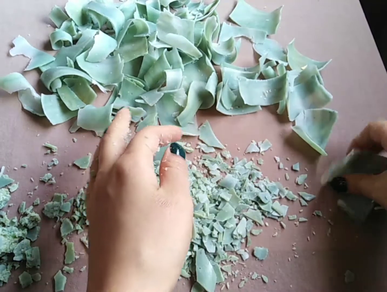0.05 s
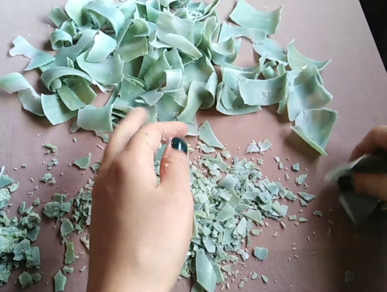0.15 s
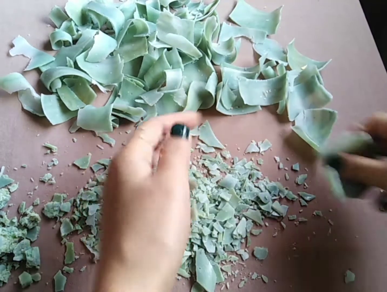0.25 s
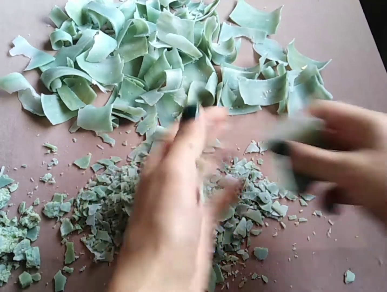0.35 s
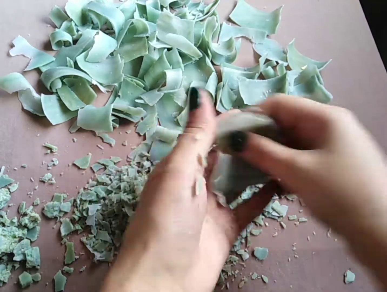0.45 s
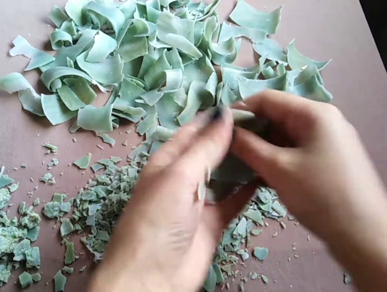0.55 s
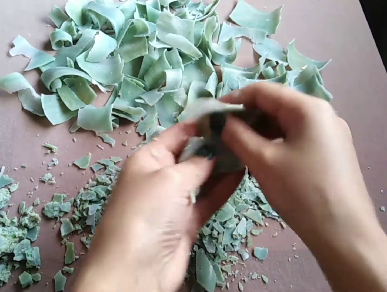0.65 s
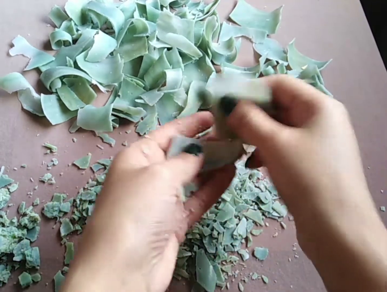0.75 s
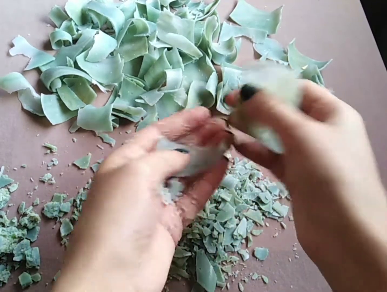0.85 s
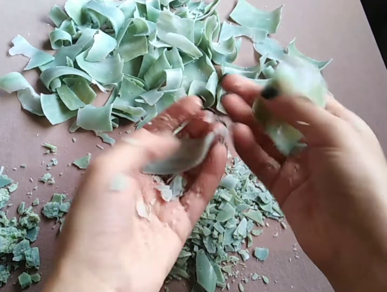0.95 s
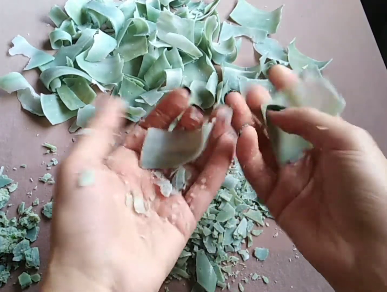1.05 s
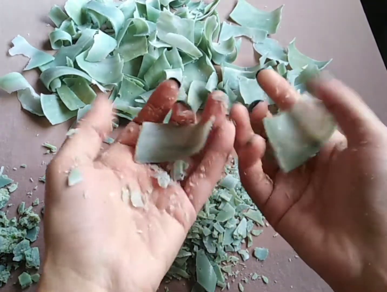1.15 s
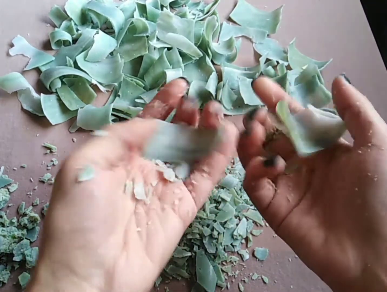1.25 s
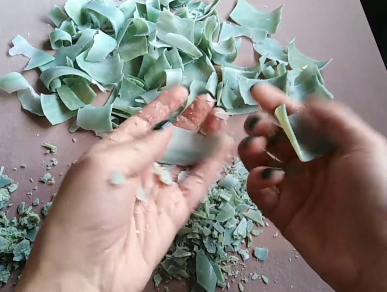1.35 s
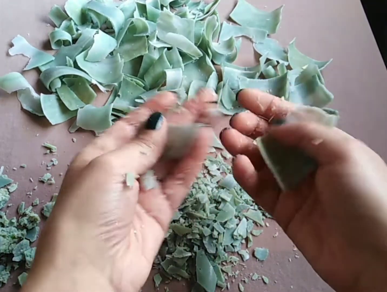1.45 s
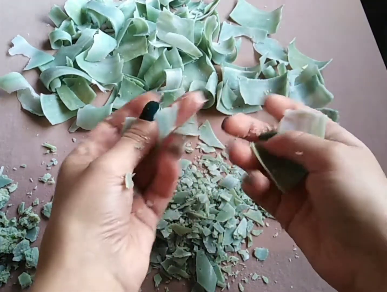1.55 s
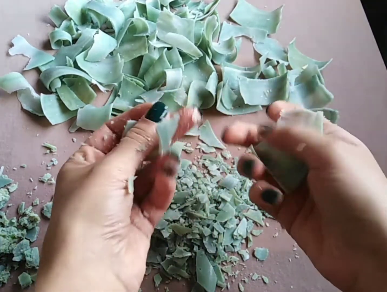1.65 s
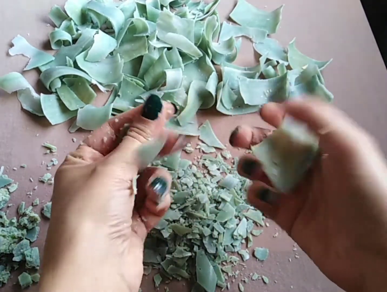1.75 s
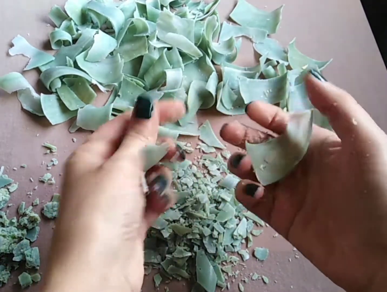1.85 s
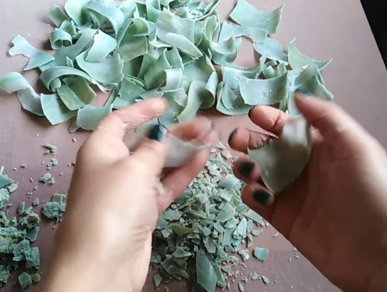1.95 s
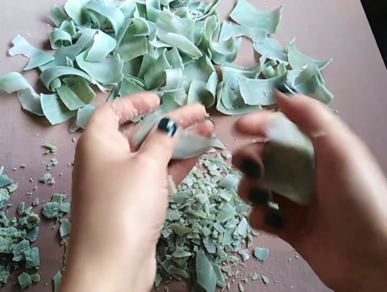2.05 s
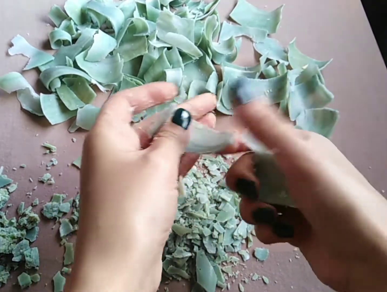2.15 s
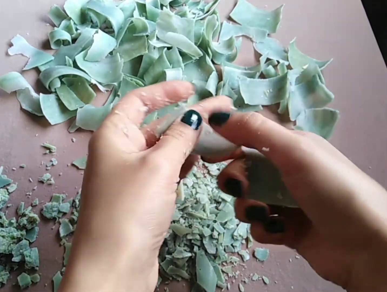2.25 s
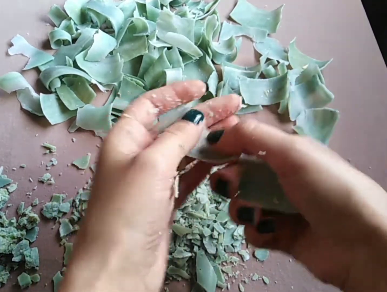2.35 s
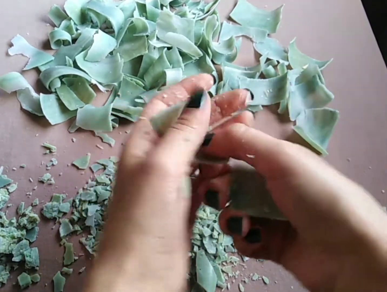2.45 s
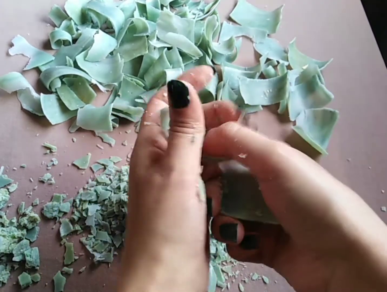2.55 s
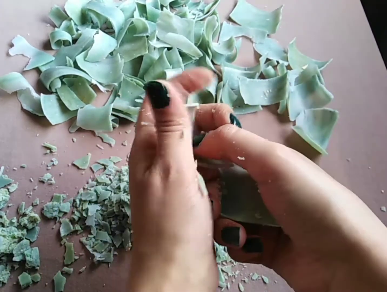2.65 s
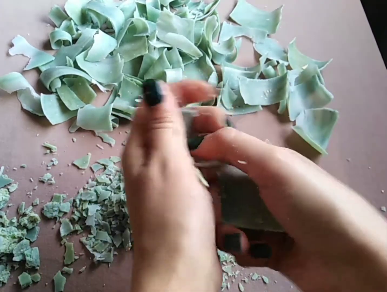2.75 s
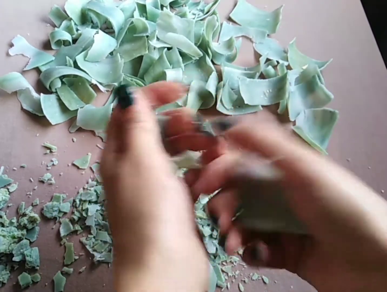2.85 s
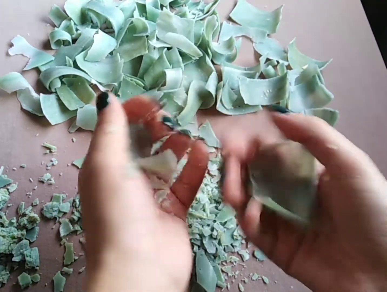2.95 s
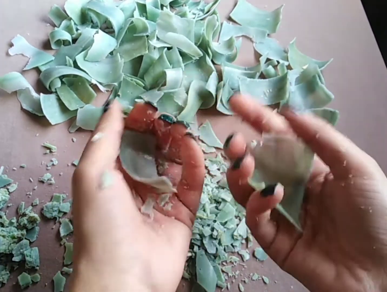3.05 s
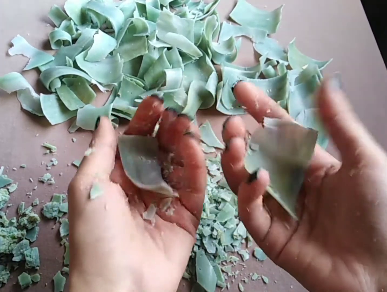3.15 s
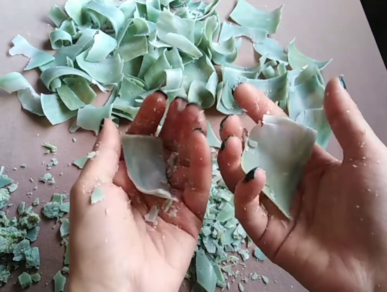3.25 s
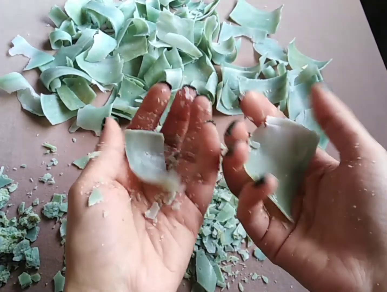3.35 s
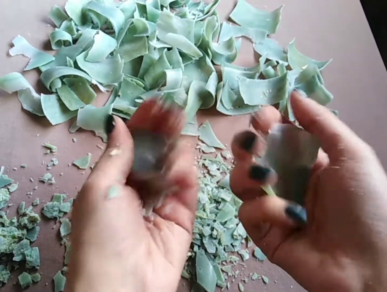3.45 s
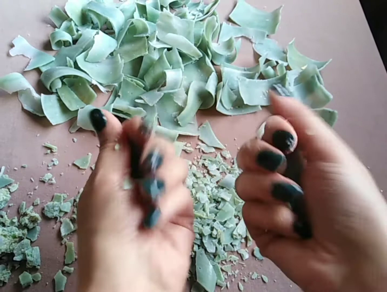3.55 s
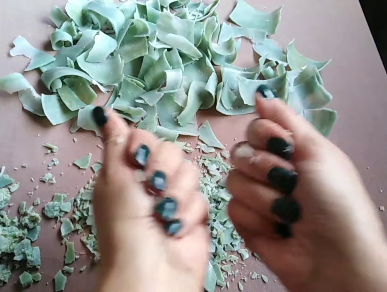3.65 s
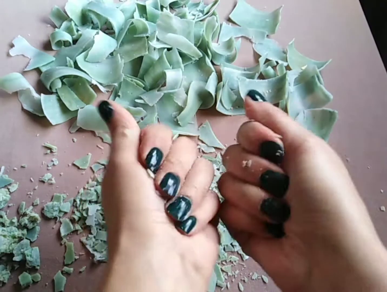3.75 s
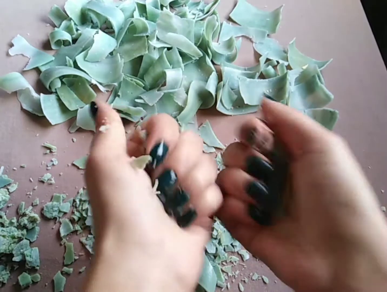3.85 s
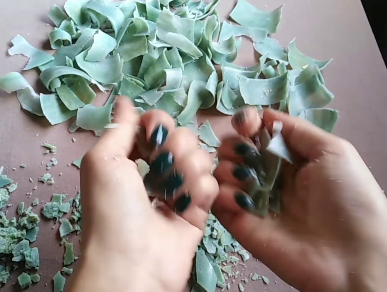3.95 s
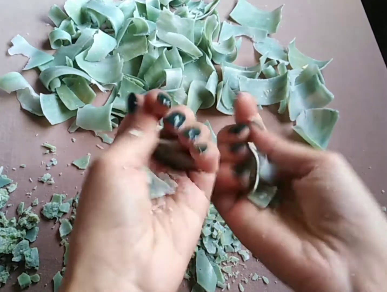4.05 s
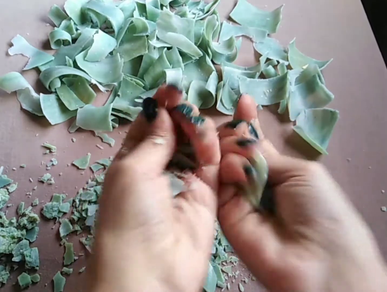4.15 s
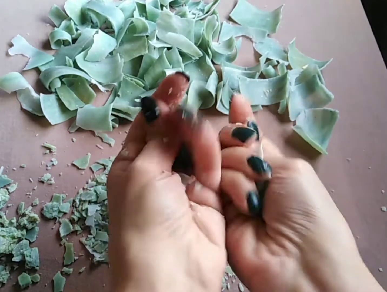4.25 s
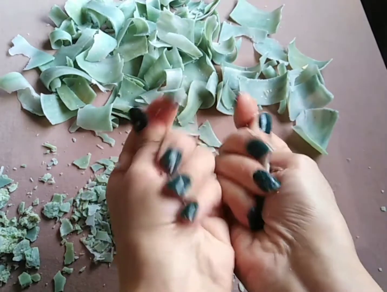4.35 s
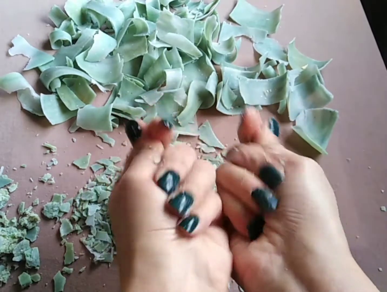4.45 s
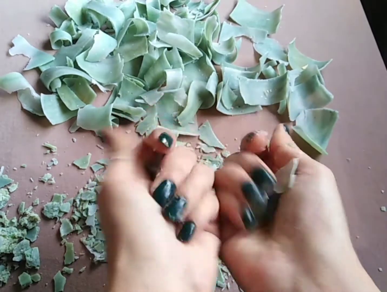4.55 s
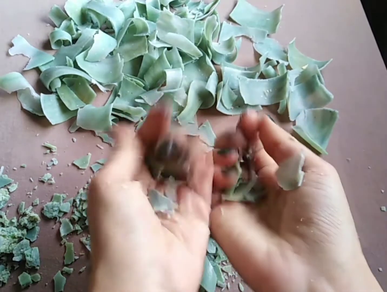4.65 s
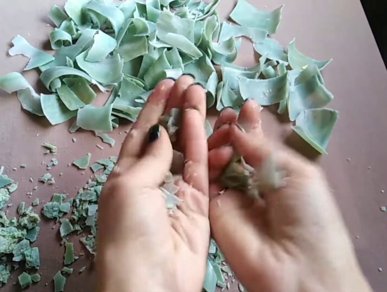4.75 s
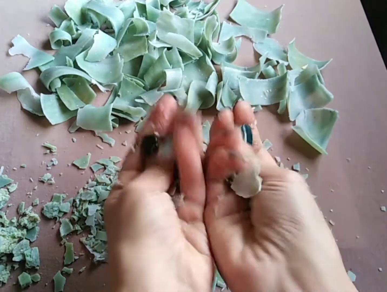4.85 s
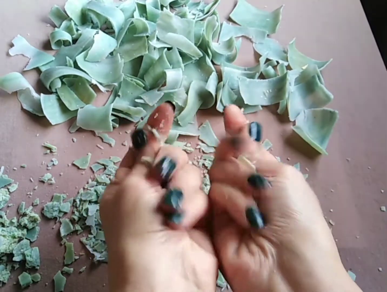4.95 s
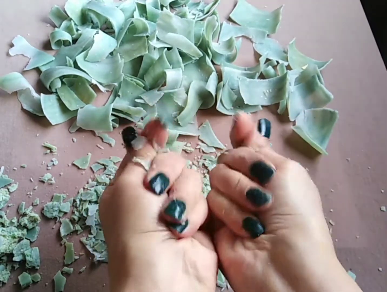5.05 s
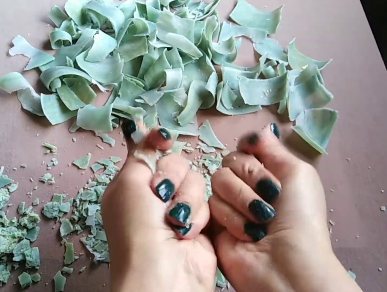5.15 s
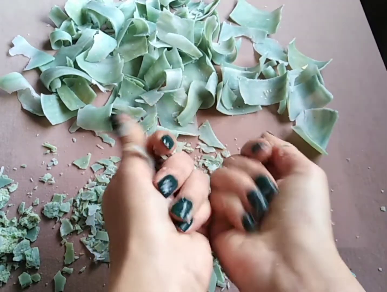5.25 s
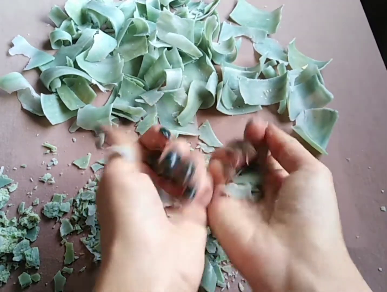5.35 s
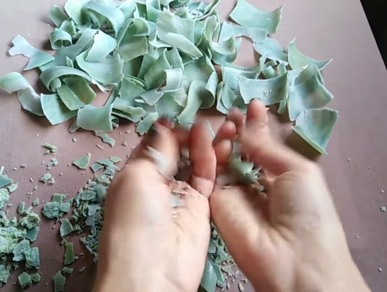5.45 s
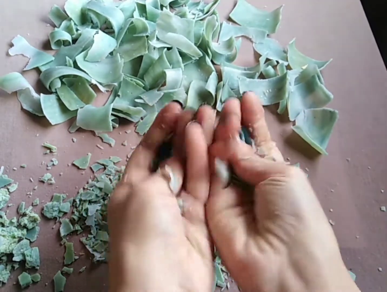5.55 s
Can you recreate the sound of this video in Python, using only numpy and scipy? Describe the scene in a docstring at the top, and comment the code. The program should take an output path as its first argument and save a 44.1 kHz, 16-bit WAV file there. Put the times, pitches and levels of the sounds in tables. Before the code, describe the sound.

Very close stereo capture of dry soap shavings in two hands over a table. A few light ticks and snaps come first, then a quiet stretch, single clicks, and a sudden loud dense crunch as the fists close. Crackling squeezes follow in bursts, with gritty crumbs between them. Small, quiet room, with soft hiss, faint outside rumble and a low hum that swells late.

```python
"""In a small quiet room, brittle curls of soap are handled, then crushed in two fists close over a table.
Flakes snap one by one as noise-driven resonances; curls tear as swelling runs of slips near one pitch.
Between the snaps crumbs grind and rustle: random clicks, scattered at random among resonances of many pitches.
A low rumble from outside wavers and a drone swells, made of resonant noise and a wandering tone,
under the steady hiss of a small pair of microphones."""
import sys
import numpy as np
from scipy import signal
from scipy.fft import rfft, irfft, next_fast_len
from scipy.io import wavfile

SR = 44100
rng = np.random.default_rng(int(sys.argv[2]) if len(sys.argv) > 2 else 0)


def waveform_to_disk(signal):
    """Save audio, clipped to [-1, 1], as 16-bit WAV at the path in sys.argv[1]."""
    frames = np.transpose(np.atleast_2d(signal))
    scaled = np.clip(frames, -1, 1) * 32767
    samples = np.round(scaled).astype(np.int16)
    wavfile.write(sys.argv[1], SR, samples)


N = 247397

# Fingers grinding crumbs; dust_db is the finest dust against the level:
# full_force_s, level_db, held_s, pitch_hz, dust_db
GRINDS = [(0.0, -52.5, 0.054, 4345, -12), (0.158, -48, 0.021, 3300, -9), (0.22, -52.5, 0.021, 4800, -8.5),
          (0.58, -55, 0.069, 5100, -16), (0.67, -50, 0.016, 5560, -2), (0.71, -49, 0.031, 5200, -27),
          (0.715, -54.5, 0.029, 3120, -28), (0.72, -60, 0.029, 1800, -28), (0.8, -58.5, 0.068, 5470, -11),
          (0.91, -57.5, 0.068, 5900, -3), (1.025, -52, 0.045, 4700, 1), (1.099, -48.5, 0.043, 5070, 2.5),
          (1.27, -59, 0.064, 5560, -5.5), (1.481, -51.5, 0.045, 4460, -6.5),
          (1.57, -54.5, 0.044, 5640, -4.5), (1.98, -56.5, 0.068, 5400, -25),
          (2.13, -55.5, 0.051, 5800, -30), (2.56, -50, 0.038, 4300, -17), (2.65, -53.5, 0.055, 5000, -12),
          (2.765, -54.5, 0.019, 4700, -25), (3.009, -47.5, 0.043, 5200, -1.5), (3.08, -52, 0.023, 4500, -9),
          (3.23, -59.5, 0.022, 4960, -8), (3.53, -60.5, 0.062, 4930, -21), (3.625, -35.5, 0.035, 3230, -4),
          (3.68, -27.5, 0.027, 2760, -1.5), (3.701, -21.5, 0.014, 3280, -1.5),
          (3.735, -26, 0.033, 2900, -16.5), (3.9, -42, .07, 3000, -7), (4.03, -47.5, 0.039, 3500, -14),
          (4.11, -45.5, 0.12, 4200, -36), (4.261, -38, 0.011, 3970, -8), (4.315, -41, 0.069, 3800, -7),
          (4.41, -38.5, 0.056, 3170, -8), (4.497, -44.5, 0.042, 3140, -14), (4.6, -53, 0.073, 2880, -9),
          (4.58, -56, .06, 5400, -10), (4.71, -54, 0.044, 5000, -16), (4.83, -53.5, .06, 5260, -18),
          (4.939, -34, 0.052, 4130, -6), (4.999, -38.5, 0.022, 3730, -7), (5.055, -40, 0.024, 3700, -10),
          (5.11, -48.5, 0.057, 3500, -8), (5.19, -47.5, 0.055, 1460, -17), (5.321, -49.5, 0.037, 2420, -22),
          (5.37, -53, 0.061, 3630, -26.5), (5.53, -57, 0.079, 5120, -9)]
GRIP_DB_PER_S, EASE_DB_PER_S = 1400.5, 210.5   # how fast a grind sets in and lets go
SETTLE_DB, SETTLE_DB_PER_S = -20.5, 70.5   # loose crumbs trickle on, this far below, fading slowly
# splintering of a 0 dB snap at 4 kHz; louder, deeper ones splinter longer
SPLINTER_T60_S, SPLINTER_S_PER_DB, SPLINTER_S_PER_OCTAVE = 0.019, .0001, -.003
TABLE_ECHO_S, TABLE_ECHO_DB = .0017, -14   # each snap bounces between table and hands
HUM_HZ = 132.7   # centre of the wavering hum
HISS_DB = -65
ROOM_T60_S, ROOM_DB = 0.28, -18   # T60 at the lowest pitches
WALL_CUT_HZ = 1900   # corner of the treble loss over 800 samples of travel
PORT_LAG = 1   # samples by which the left port hears the hands later
RIGHT_PORT_DULL = .15   # one-pole share that shades the right port's treble
CUTOFF_HZ = 15700


def from_db(db):
    """Decibels are twenty times the logarithm of an amplitude ratio."""
    return 10 ** (np.asarray(db) / 20)


def rms_one(x):
    """Normalisation: root-mean-square value 1."""
    return x / np.sqrt(np.mean(x ** 2) + 1e-20)


def in_time(rows):
    """Linear interpolation of every column over time."""
    s, *columns = np.transpose(rows)
    return [np.interp(np.arange(N) / SR, s, c) for c in columns]


def at_hz(points, hz):
    """Interpolation along a logarithmic frequency axis."""
    point_hz, values = np.array(points).T
    return np.interp(np.log(hz), np.log(point_hz), values)


def drift(rate_hz):
    """Slow chance: noise through a double one-pole low-pass, spread 1."""
    step = 40   # samples between computed values
    r = np.exp(-2 * np.pi * step * rate_hz / SR)
    white = rng.standard_normal(N // step + 2002)
    slow = signal.lfilter([1], [1, -2 * r, r * r], white)[2000:]
    return np.interp(np.arange(N) / step, np.arange(len(slow)), rms_one(slow))


def resonate(x, hz, width_hz):
    """Two-pole resonance with gain 1 at its peak."""
    r = np.exp(-np.pi * width_hz / SR)
    zeros = np.array([1, 0, -1]) * (1 - r * r) / 2
    return signal.lfilter(zeros, [1, -2 * r * np.cos(2 * np.pi * hz / SR), r * r], x)


def band(x, low_hz, high_hz):
    """Butterworth band-pass: flat between its corners."""
    return signal.sosfilt(signal.butter(2, [low_hz, high_hz], "band", fs=SR, output="sos"), x)


def blend(mid, side, alike):
    """Interchannel correlation: shared and opposed noise mixed to a given likeness."""
    alike = np.clip(alike, -1, 1)
    return np.sqrt(1 + alike) * mid + np.sqrt(1 - alike) * side * [[1], [-1]]


def pair(alike):
    """White noise in two channels with the given correlation."""
    mid, side = rng.standard_normal((2, N))
    return blend(mid, side, alike)


def grinding(t):
    """Power envelope of each grind: it grips, holds and eases exponentially, and its crumbs settle."""
    s, db, held = np.transpose(GRINDS)[:3, :, None]
    after = np.maximum(t - s - held, 0)
    fade = from_db(-EASE_DB_PER_S * after) + from_db(SETTLE_DB - SETTLE_DB_PER_S * after)
    grip = from_db(db - GRIP_DB_PER_S * np.maximum(s - t, 0))
    return (grip * fade) ** 2


def crumbs(per_s, light_octaves, hard_octaves, lumps_db):
    """Granular fracture: countless tiny clumped clicks ring loudest near each grind's pitch."""
    _, level_db, _, pitch_hz, dust_db = np.transpose(GRINDS)[:, :, None]
    squeeze = np.interp(level_db, [-53, -37], [0, 1])
    octaves = light_octaves + squeeze * (hard_octaves - light_octaves)   # harder squeezing spreads the pitches
    pitches = np.geomspace(350, 13000, num=30)
    dealt = rng.integers(0, 30, (2, N))   # pitch number of the click at each sample
    near = np.exp(-.5 * (np.log2(pitches / pitch_hz) / octaves) ** 2)
    dust = from_db(dust_db) * np.exp(-.5 * (np.log2(pitches / 10000) / .5) ** 2)
    # the cupped fist rings lower down
    lumps = from_db(lumps_db) * squeeze * np.exp(-.5 * (np.log2(pitches / 800) / 0.68) ** 2)
    near_power = (2.48 * near ** 2).sum(axis=1, keepdims=True)   # 2.48: the flicker adds power
    shares = (near + dust + lumps) ** 2 / near_power
    t = np.arange(0, N + 64, 64) / SR
    gains = in_time(np.c_[t, np.sqrt(grinding(t).T @ shares)])
    sizes = from_db(2.0 * np.minimum(rng.exponential(1, (2, N)), 5)) * rng.choice([-1, 1], (2, N))
    struck = rng.random((2, N)) < per_s / SR
    clicks = sizes * struck * from_db(1.56 * drift(34)) + 1e-18
    out = 0
    for k, hz in enumerate(pitches):
        grains = resonate(resonate(clicks * (dealt == k), hz, 0.077 * hz), hz, 0.26 * hz)
        out = out + gains[k] * from_db(2.2 * drift(16.5)) * rms_one(grains)
    return out


def rumble():
    """Resonant noise: two low ranges, lumpy in level, partly correlated between the channels."""
    # Rumble from outside, before the channel gains: start_s, deep_db, upper_db
    levels = [(0, -42.5, -41.5), (0.1, -51.5, -63.5), (0.4, -58.5, -72), (0.7, -53.5, -69), (1.1, -58, -61),
              (1.4, -49, -58.5), (1.66, -59, -68.5), (1.8, -53, -53.5), (1.95, -55, -58.5),
              (2.06, -46.5, -43), (2.2, -50.5, -55), (2.4, -47, -63), (2.56, -48.5, -50),
              (2.78, -47.5, -53.5), (2.95, -50, -59.5), (3.4, -49, -52.5), (3.85, -47, -46.5),
              (4.1, -47.5, -57), (4.4, -45.5, -44.5), (4.6, -47.5, -58), (5.0, -44, -55.5),
              (5.61, -48, -64)]
    deep_db, upper_db = in_time(levels)
    white = pair(0.42)
    deep = rms_one(band(resonate(white, 89.0, 60), 55, 131.7)) * from_db(deep_db)
    upper = rms_one(band(resonate(white, 179.5, 37.9), 130, 260)) * from_db(upper_db + 1.85 * drift(4.3))
    return (deep + upper) * from_db([[.7], [-.7]])   # the left is 1.4 dB stronger


def hiss():
    """Stationary noise: half-octave bands, each with its own spectral density and correlation."""
    # Relative spectral density: pitch_hz, level_db (per Hz)
    density = [(30, -5), (60, -30), (250, -26), (450, -23.5), (3500, -27.5), (5500, -29), (13500, -27.5),
               (16000, -44)]
    # Left-right correlation: pitch_hz, likeness (0 to 1)
    likeness = [(300, 0.26), (700, 0.042), (4500, .05), (8000, 1)]
    out, edges = 0, 25 * 2 ** np.arange(0, 9.6, .5)
    white = rng.standard_normal((2, 2, N))
    for k, (low, high) in enumerate(zip(edges, edges[1:])):
        mid, side = band(white[k % 2], low, high)   # neighbours use separate noise
        hz = np.sqrt(low * high)
        out = out + from_db(at_hz(density, hz)) * blend(mid, side, at_hz(likeness, hz))
    return from_db(HISS_DB) * rms_one(out)


def snaps(spread=0.23, splinter_db=-7.0, rise_s=0.00068, alike=0.41, thud_db=-23,
          broad_db=-3, broad_per_db=0.7, onset_db=-12, onset_s=.0008):
    """Impulse excitation: soft onset, crack and dying splinters ring a flake's two modes and jolt the table."""
    # Flakes breaking, levels before chance and echoes; treble_db is against the pitch:
    # crack_s, peak_db, pitch_hz, treble_db
    flakes = [(0.046, -42, 2660, -9), (0.160, -31, 3400, -17), (0.1668, -26.5, 3380, -19),
              (0.574, -31.5, 5340, -26), (0.626, -36, 4950, -16), (0.6348, -31.5, 6400, -18),
              (0.6717, -26.5, 5800, 2), (0.7044, -34, 5800, -27), (0.91, -38.5, 5700, -19),
              (0.9155, -36, 5500, -10), (0.9742, -33.5, 6200, 5.5), (1.0455, -21.5, 5670, 2),
              (1.101, -17, 4880, -16), (1.1036, -15, 6600, -9), (1.111, -21.5, 6700, 2),
              (1.275, -35, 5460, -29), (1.5899, -36, 4800, -22), (2.5584, -18.5, 4280, -33),
              (2.659, -27.5, 5470, -27), (2.7762, -42, 3000, -30), (3.0047, -25, 5700, -30),
              (3.014, -22, 5700, -32), (3.0318, -15.5, 5900, 0), (3.0875, -37, 4100, -14),
              (3.541, -39, 5040, -24), (3.6232, -15.5, 3430, -15), (3.6391, -13.5, 5430, -5),
              (3.6449, -15.5, 3580, 1), (3.665, -14.5, 4380, -10), (3.7016, -6.5, 2900, 4),
              (3.7055, -2.5, 4050, 3.5), (3.7105, -7.5, 3393, 6), (3.754, -13.5, 4500, -9),
              (3.7744, -15.5, 4480, -7), (3.9049, -25, 1760, -18), (3.9366, -22, 2530, -16),
              (3.9488, -21.5, 2500, -22), (4.167, -24, 5300, -37), (4.1766, -29.5, 2660, -30),
              (4.258, -17.5, 2790, 1.5), (4.2622, -16.5, 5170, -24.5), (4.3144, -27, 4300, -15),
              (4.319, -22, 4430, -10), (4.3395, -17, 4400, -19.5), (4.3473, -19, 2820, -20),
              (4.3617, -21, 3250, -9), (4.3703, -27.5, 3000, 12.5), (4.386, -5.5, 3000, -23),
              (4.4307, -13.5, 6200, -4), (4.441, -26, 2580, -4.5), (4.4525, -28, 2300, -10),
              (4.4987, -23.5, 3880, -23), (4.5157, -33.5, 2100, -20), (4.9164, -15, 4120, -27),
              (4.9438, -24.5, 2700, -24.5), (4.9537, -15.5, 4600, 8.5), (4.976, -14, 4800, -1),
              (4.9994, -18, 6100, -17), (5.021, -27, 3080, -17.5), (5.06, -21, 2470, -19),
              (5.0624, -16, 5800, -7), (5.15, -32, 5030, -8.5), (5.1792, -32.5, 1380, -24),
              (5.1964, -20, 1565, -14), (5.376, -31, 3030, -24), (5.5588, -36, 5670, -6)]
    t = np.arange(2048) / SR
    lead = 256   # samples of soft rise before the crack
    since = t - lead / SR
    after = np.maximum(since, 0)
    out = np.zeros((2, N + len(t)))
    for s, peak_db, hz, treble_db in flakes:
        t60 = SPLINTER_T60_S + SPLINTER_S_PER_DB * peak_db + SPLINTER_S_PER_OCTAVE * np.log2(hz / 4000)
        shared, left, right = rng.standard_normal((3, len(t))) * rng.exponential(1, len(t))
        splinters = alike * shared + (1 - alike) * np.array([left, right])   # the microphones share only part
        decay = from_db(splinter_db - 60 * after / max(t60, .002))
        force = decay * (1 - np.exp(-after / rise_s)) * splinters
        onset = np.exp((since - after) / onset_s) * (after == 0)
        force += from_db(onset_db) * onset * splinters
        force[:, lead] += 2.2   # the crack itself
        overtone_hz = min(hz * rng.uniform(1.0, 1.78), 12000)   # no two flakes have the same shape
        modes = resonate(force, hz, spread * hz) + 0.27 * resonate(force, overtone_hz, spread * hz)
        body = band(band(modes, 0.5 * hz, 14200), 0.4 * hz, 14500)
        treble = band(band(force, 7200, 15000), 3700, 15300)
        thud = band(abs(force), 120, 650)
        broad = band(band(force, 0.44 * hz, min(2.13 * hz, 14000)), .4 * hz, 16000)
        wide_db = broad_db + broad_per_db * peak_db   # harder snaps crack wider
        heavy_db = thud_db - 9 * np.log2(hz / 2500)   # big, deep flakes jolt harder
        parts = (body, 0), (broad, wide_db), (treble, treble_db), (thud, heavy_db)
        sound = sum(from_db(db) * x / abs(x).max() for x, db in parts)
        at = round(s * SR) - lead
        out[:, at:at + len(t)] += from_db(peak_db + rng.normal(0, 1.6, (2, 1))) * sound
    bounce = np.r_[1, np.zeros(round(TABLE_ECHO_S * SR) - 1), -from_db(TABLE_ECHO_DB)]
    return signal.lfilter([1], bounce, out[:, :N] + 1e-18)


def drone():
    """Frequency modulation: a sine hum wavers in pitch below flickering bands of resonant noise."""
    # The swell, before channel gains and flicker: start_s, hum_peak_db, whirr_db
    swell = [(2.8, -66, -92), (3.6, -54.5, -78), (3.9, -46.5, -66), (4.8, -45.5, -62), (5.61, -48, -64.5)]
    # Two soft bands above the hum, relative levels: pitch_hz, width_hz, level_db
    whirr_bands = [(406, 74, -1), (960, 300, 2)]
    hum_db, whirr_db = in_time(swell)
    hum_hz = HUM_HZ + 1.48 * drift(2.79)
    hum = np.sin(2 * np.pi * np.cumsum(hum_hz) / SR) * from_db(hum_db)
    air = pair(0.1)
    whirr = 0
    for hz, width, db in whirr_bands:
        tone = rms_one(resonate(resonate(air, hz, width), hz, width))
        whirr = whirr + from_db(db + 4.1 * drift(12)) * tone
    return hum * from_db([[.7], [-.7]]) + from_db(whirr_db) * whirr


def tears(spread=0.24, grit_db=-3, jolt_db=-14, alike=.45, steady=.6):
    """Stick-slip excitation: a swelling run of slips drives a curl's one mode, with grit and a jolt."""
    # Cracks running slowly through a thick curl, level of the mode: start_s, peak_db, pitch_hz, length_s
    curls = [(3.6255, -19, 2410, 0.0083), (3.686, -14.5, 2610, 0.011), (3.696, -15.5, 3020, 0.0067),
             (3.6998, 1.5, 2329, .0075), (3.7062, -6.5, 4520, .003), (3.7127, -5, 1800, 0.0031),
             (3.7152, -12, 2300, .007), (3.752, -22, 1555, .007), (3.774, -21, 1260, .007),
             (3.821, -33, 1460, .006), (5.336, -40, 2460, 0.013)]
    t = np.arange(2048) / SR
    out = np.zeros((2, N + len(t)))
    for s, peak_db, hz, length in curls:
        shared, left, right = rng.standard_normal((3, len(t))) * rng.exponential(1, len(t))
        swell = np.sin(np.pi * np.clip(t / max(length, .001), 0, 1))
        slips = swell * (alike * shared + (1 - alike) * np.array([left, right]))
        phase = np.array([[0], [1.2]])   # radians: the right port hears it shifted
        driven = steady * swell * np.sin(2 * np.pi * hz * t + phase) + slips
        mode = resonate(resonate(driven, hz, spread * hz), hz, hz)
        grit = band(slips, hz, 14000)
        jolt = band(abs(slips), 150, 900)
        parts = (mode, 0), (grit, grit_db), (jolt, jolt_db)
        at = round(s * SR)
        out[:, at:at + len(t)] += from_db(peak_db) * sum(from_db(db) * x / abs(x).max() for x, db in parts)
    return out[:, :N]


def room(x):
    """Reverberation: eight feedback delays a side, duller on every round."""
    size = next_fast_len(N + SR)
    w = 2 * np.pi * np.arange(size // 2 + 1) / size   # radians per sample
    dull = 1 / np.sqrt(1 + (w * SR / (2 * np.pi * WALL_CUT_HZ)) ** 2)
    out = np.zeros((2, len(w)), complex)
    for k, lag in enumerate(rng.uniform(0.0064, 0.093, 16) * SR):
        loss = from_db(-60 * lag / SR / ROOM_T60_S) * dull ** (lag / 800)
        loop = loss * np.exp(-1j * w * round(lag))
        out[k % 2] += loop / (1 - loop) * (-1) ** (k // 2)   # endless rounds as a geometric series
    return irfft(out * rfft(x.mean(axis=0), size), size)[:, :N]


def ports(x):
    """Port resonance and path delay: the left favours crisp treble and lies farther, the right the middle."""
    # Left, then right resonance; level_db is added to the unfiltered sound: pitch_hz, width_hz, level_db
    resonances = [(5970, 2300, 5), (1800, 2030, -5.5)]
    left, right = (side + from_db(db) * resonate(side, hz, width)
                   for side, (hz, width, db) in zip(x, resonances))
    shaded = signal.lfilter([1 - RIGHT_PORT_DULL], [1, -RIGHT_PORT_DULL], right)
    return np.array([np.roll(left, PORT_LAG), shaded])


def scene():
    """Superposition: soap with its room, over the low sounds and the hiss."""
    soap = crumbs(per_s=9000, light_octaves=0.27, hard_octaves=0.86, lumps_db=-8) + snaps() + tears()
    return ports(soap + from_db(ROOM_DB) * room(soap)) + rumble() + drone() + hiss()


def record(dry):
    """Soft saturation and low-pass: the loudest crack overloads; the top is cut."""
    held = dry / (1 + abs(dry) ** 4) ** .25
    return signal.sosfilt(signal.cheby2(14, 60, CUTOFF_HZ, fs=SR, output="sos"), held)


dry = scene()
out = record(dry)
waveform_to_disk(out)
```